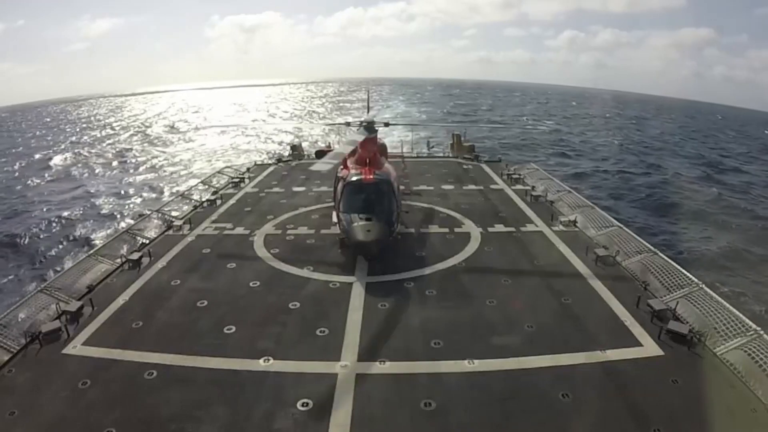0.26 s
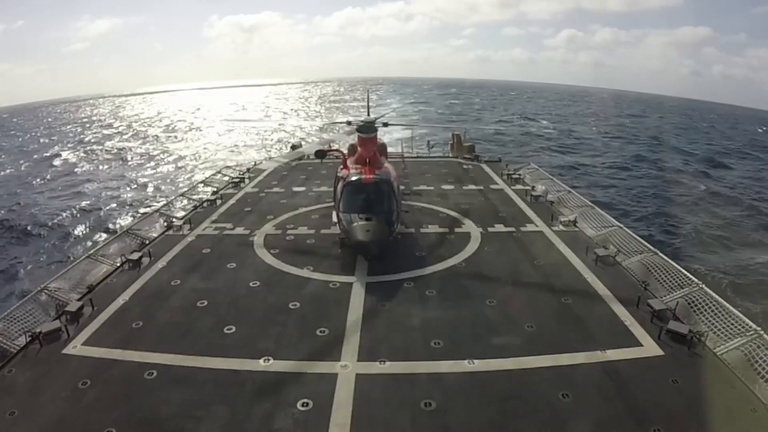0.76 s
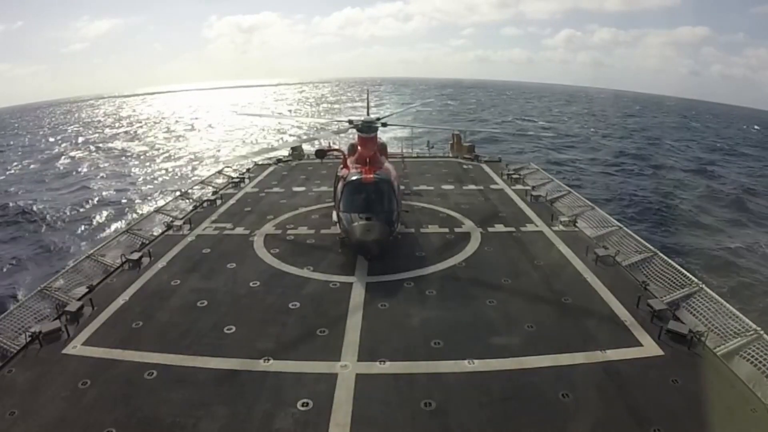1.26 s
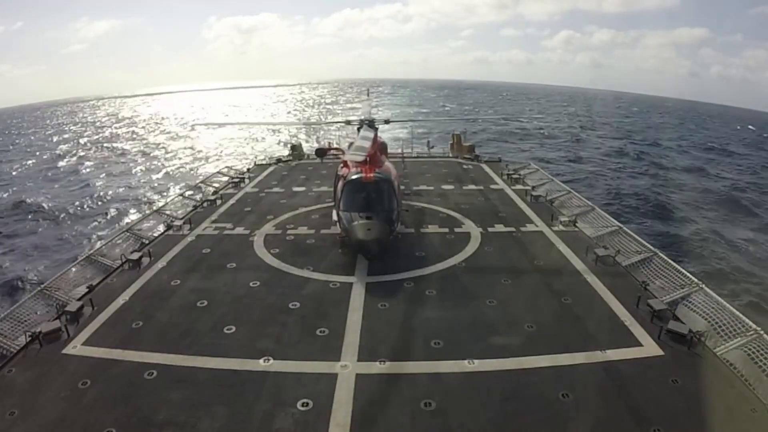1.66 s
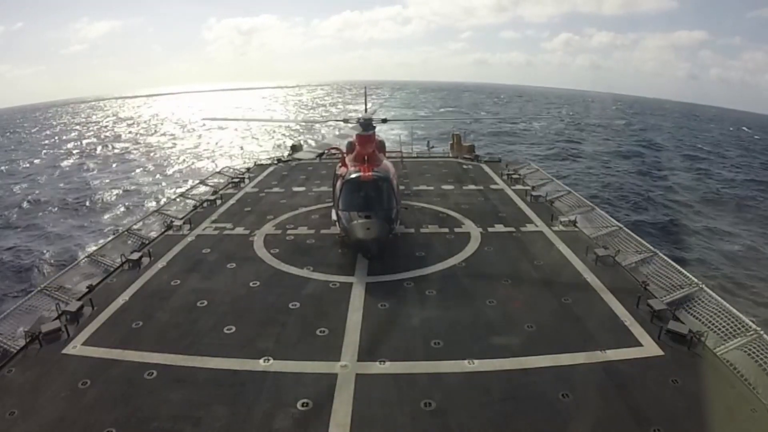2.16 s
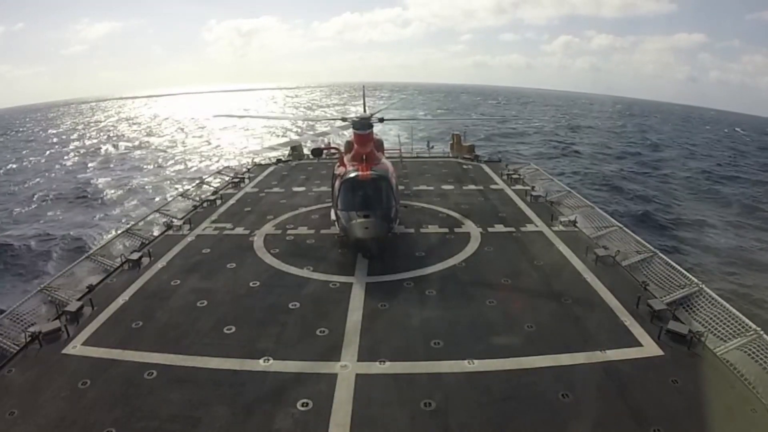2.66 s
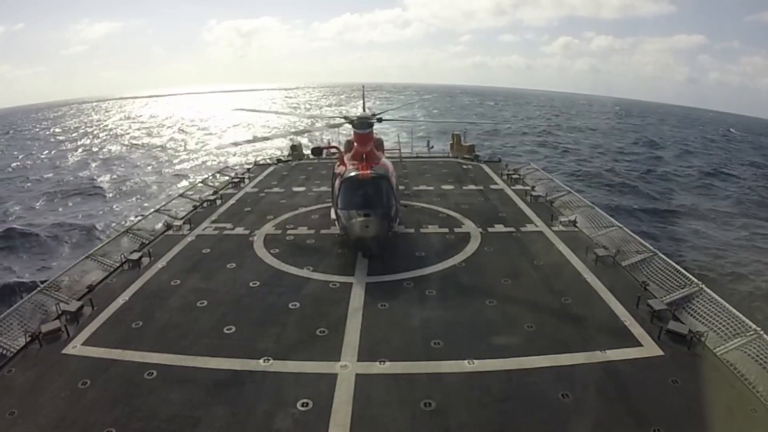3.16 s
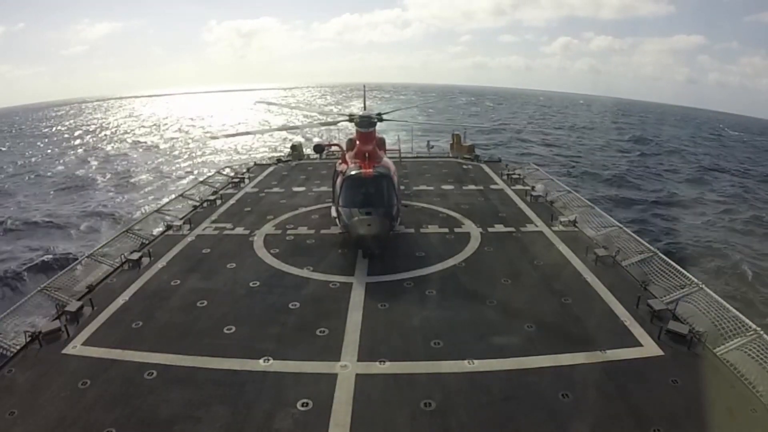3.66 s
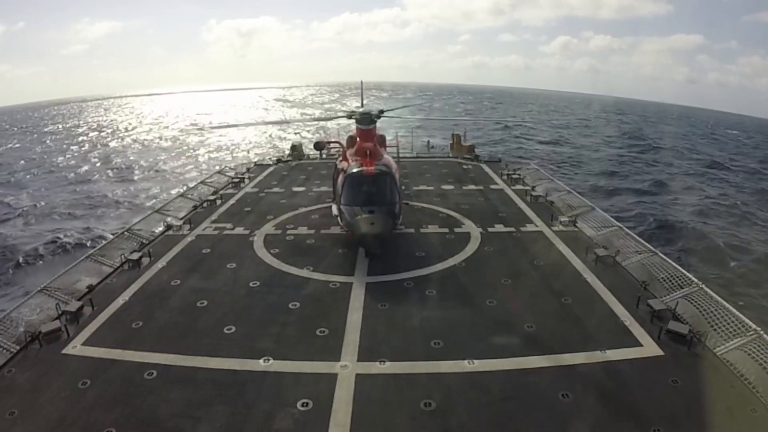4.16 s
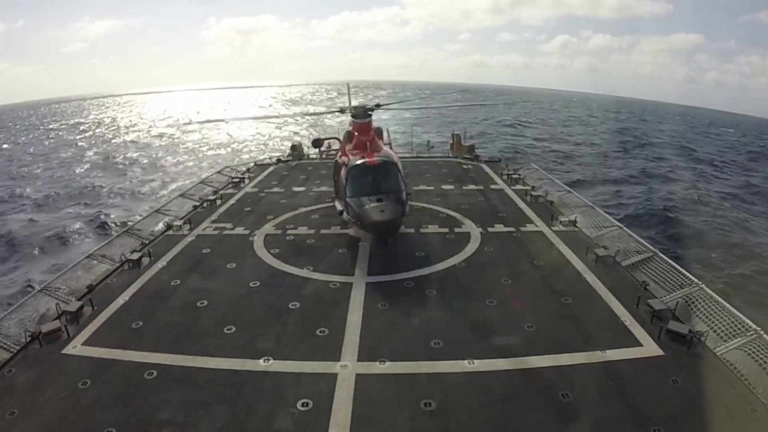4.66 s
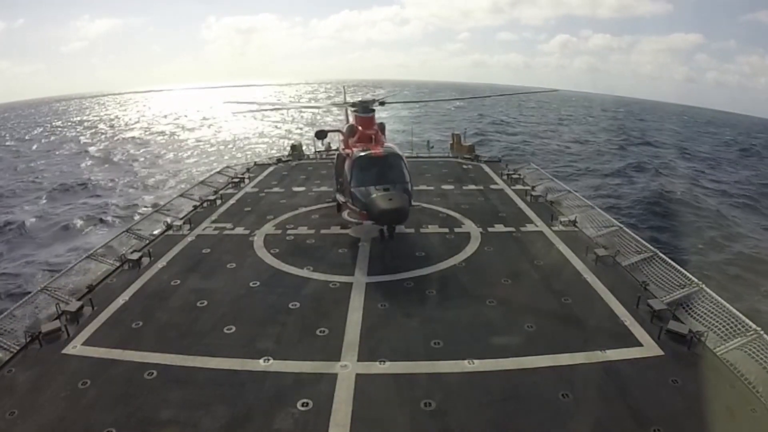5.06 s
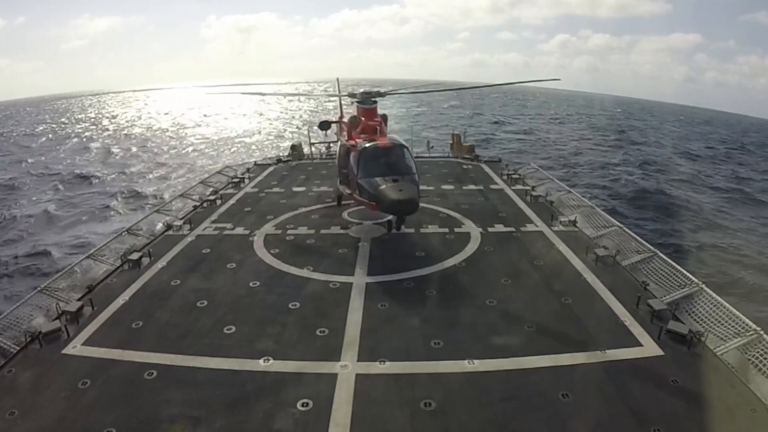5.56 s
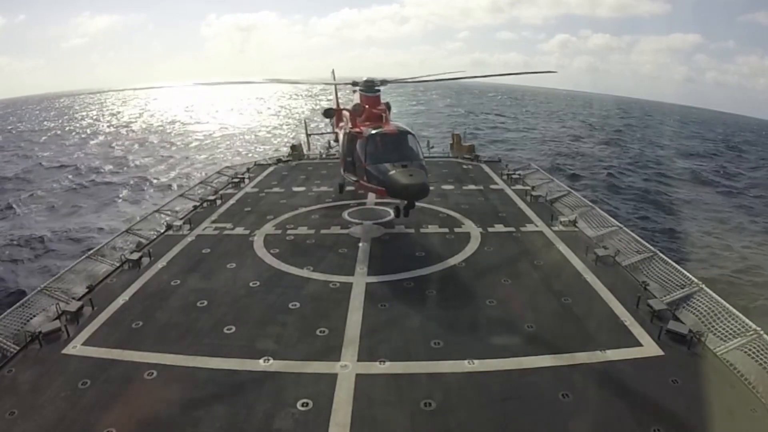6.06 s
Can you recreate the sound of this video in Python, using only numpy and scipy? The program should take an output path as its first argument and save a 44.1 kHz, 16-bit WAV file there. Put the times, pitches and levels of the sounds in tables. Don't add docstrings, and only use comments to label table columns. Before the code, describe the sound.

Muffled heavy blade chopping at about twenty-four beats a second grows louder and rougher through takeoff, with dull cracks, light rustles and faint turbine hiss.

```python
import sys
import numpy as np
from scipy import signal
from scipy.fft import rfft, irfft
from scipy.io import wavfile
from scipy.ndimage import uniform_filter1d, map_coordinates

SR = 44100
rng = np.random.default_rng(int(sys.argv[2]) if len(sys.argv) > 2 else 0)


def nominal_scale(level):
    x = np.asarray(level, float) / 20
    return 10 ** x


def dump(signal):
    limited = np.clip(np.atleast_2d(signal).T, -1, 1)
    pcm = np.round(limited * 32767).astype(np.int16)
    wavfile.write(sys.argv[1], SR, pcm)


N = 278271


def unit(x):
    return x / np.sqrt(np.mean(np.abs(x) ** 2) + 1e-20)


def along(points, hz):
    f, v = np.transpose(points)
    return np.interp(np.log(hz + 1), np.log(f + 1), v)


def curves(rows):
    s, *cols = np.transpose(rows)
    return [np.interp(np.arange(N) / SR, s, c) for c in cols]


def wobble(rate):
    return map_coordinates(rng.standard_normal(N // 256), [np.arange(N) * rate / SR])


def turns(hz):
    return 2 * np.pi * np.cumsum(hz) / SR


def swells(rows):
    t = np.arange(0, N / SR + .01, .004)
    s, db, half = np.transpose(rows)[:, :, None]
    bells = nominal_scale(db - 9 * ((t - s) / half) ** 2)
    return np.interp(np.arange(N) / SR, t, np.sqrt(np.sum(bells ** 2, axis=0)))


LIFT_S, LIFT_TAKES_S = 4.1, .12


def airborne():
    return .5 + .5 * np.tanh((np.arange(N) / SR - LIFT_S) / LIFT_TAKES_S)


# centre_hz, width_hz, lift_db
CASE_MODES = [(490, 140, 5), (923.5, 70, 3.5), (1537, 70, 6), (2070, 340, 1.5), (4240, 230, 3),
              (5840, 320, 2.5), (386, 19, -6)]


def case_gain(hz):
    return nominal_scale(sum(db / (1 + (2 * (hz - c) / w) ** 2) for c, w, db in CASE_MODES))


def rush(spectrum, patchy_db):
    _, _, z = signal.stft(rng.standard_normal(N + SR), SR, nperseg=512)
    field = uniform_filter1d(rng.standard_normal(z.shape), size=6, axis=0)
    field = uniform_filter1d(field, size=10, axis=1)
    x = signal.istft(z * nominal_scale(patchy_db * unit(field)), SR, nperseg=512)[1]
    hz = np.fft.rfftfreq(len(x), 1 / SR)
    coloured = rfft(x) * nominal_scale(along(spectrum, hz)) * case_gain(hz)
    return unit(irfft(coloured, len(x))[:N])


# time_s, slap_db
BLADE_LOAD = [(0, -40), (1.09, -38.5), (1.35, -36.5), (1.6, -35.5), (1.77, -32.5), (2.18, -34.5),
              (2.41, -30.5), (3.0, -31.5), (3.1, -32.5), (3.39, -29), (3.76, -32), (4.05, -28), (4.12, -23),
              (4.31, -31.5), (4.52, -30), (4.92, -32.5), (5.8, -29.5), (6.31, -30.5)]
MEAN_LOAD_DB = -32


def blade_load_db():
    return curves(BLADE_LOAD)[0]


# start_s, peak_db, centre_hz, top_hz, length_s
RUSTLE_BURSTS = [(2.022, -51.5, 3700, 6000, 0.08), (2.065, -48.5, 3740, 6450, .05),
                 (2.325, -54, 3500, 6000, .03), (3.8, -42, 3000, 6500, 0.029),
                 (3.819, -32.5, 4100, 4670, 0.029), (3.816, -42.5, 2820, 14000, 0.04),
                 (3.851, -49.5, 3500, 11000, 0.11), (3.895, -48, 5000, 10000, 0.022),
                 (3.928, -46.5, 4000, 7700, 0.082), (3.961, -41, 7260, 8420, 0.029),
                 (4.002, -42.5, 7600, 12000, 0.036), (4.058, -45, 1500, 4060, 0.023),
                 (4.083, -44.5, 1800, 6980, 0.063), (4.124, -47.5, 5400, 6950, 0.076),
                 (4.159, -53, 4040, 8350, 0.036), (5.348, -38, 2610, 3220, 0.011),
                 (5.796, -51, 2700, 3490, 0.021), (6.123, -47, 3000, 5500, 0.062)]


def rustle():
    out, t = np.zeros(N + SR), np.arange(SR // 4) / SR
    hz = np.fft.rfftfreq(len(t), 1 / SR) + 1
    for s, db, centre_hz, top_hz, length in RUSTLE_BURSTS:
        graininess = unit(uniform_filter1d(rng.standard_normal(len(t)), size=60))
        grains = rng.standard_normal(len(t)) * nominal_scale(2.5 * graininess)
        octaves = np.log2(hz / centre_hz)
        colour = nominal_scale(-4.5 * octaves + 7.2 * np.exp(-(octaves / 0.073) ** 2))
        colour *= hz ** 2 / (hz ** 2 + 1200 ** 2)
        colour /= np.sqrt((1 + (hz / top_hz) ** 8) * (1 + (hz / 12500) ** 12))
        burst = unit(irfft(rfft(grains) * colour * case_gain(hz), len(t)))
        envelope = nominal_scale(db - 5.0 - 15 * t / length) * (1 - np.exp(-t / (0.14 * length)))
        out[round(s * SR):][:len(t)] += envelope * burst
    return out[:N]


# freq_hz, density_db per Hz
JET_SPECTRUM = [(1060, -29), (1800, -1.5), (2150, -6), (2430, -10.5), (3390, -8.5), (4260, -11),
                (6670, -18.5), (9560, -22), (12800, -32), (14700, -35)]
HISS_DB, HISS_GROWS, HISS_LIFT_DB = -62.94, .12, 1.14


def jet_hiss():
    hiss_db = HISS_DB + HISS_GROWS * (blade_load_db() - MEAN_LOAD_DB) + HISS_LIFT_DB * airborne()
    return nominal_scale(hiss_db + 0.24 * wobble(6)) * rush(JET_SPECTRUM, patchy_db=1.0)


# time_s, pitch_hz
WHINE_PITCH = [
    (0, 9100),
    (.9, 9330),
    (1.4, 9530),
    (2, 9950),
    (4.3, 10560),
    (5.5, 10850),
    (6.31, 10870),
]
# peak_s, peak_db, half_length_s
LOWER_WHINE_SWELLS = [
    (.6, -90, .3),
    (2.3, -89, .2),
    (2.7, -90.5, .3),
]
UPPER_DB, LOWER_DB, LOWER_RATIO = -92.5, -95.5, .845


def compressor_whines():
    whine_hz, = curves(WHINE_PITCH)

    def whine(ratio):
        jitter_hz = (25 + 60 * airborne()) * wobble(70)
        return nominal_scale(5.5 + 2.5 * wobble(50)) * np.sin(turns(ratio * whine_hz + jitter_hz))

    lower_size = np.hypot(nominal_scale(LOWER_DB), swells(LOWER_WHINE_SWELLS))
    return nominal_scale(UPPER_DB) * whine(1) + lower_size * whine(LOWER_RATIO)


# start_s, peak_db, bright_part_db re peak
VORTEX_HITS = [(2.332, -27, -23.5), (2.456, -32, -14), (2.607, -32, -13.5), (2.645, -30, -12),
               (2.77, -31, -13), (2.852, -22.5, -27), (3.316, -25, -28), (3.357, -27, -12),
               (3.398, -18, -20), (3.44, -26.5, -12.5), (3.525, -29, -13), (3.972, -24, -14.5),
               (4.375, -30, -13), (4.503, -31, -11.5), (4.63, -26, -16), (4.71, -28, -18), (4.79, -27, -18),
               (4.885, -24, -10.5), (5.13, -28, -10), (5.559, -25, -12), (5.766, -24, -16),
               (5.796, -18, -13.5), (5.85, -24.5, -12), (6.124, -20.5, -13)]


def cracks():
    out, t = np.zeros(N + SR), np.arange(SR // 8) / SR
    for s, db, bright_db in VORTEX_HITS:
        levels_db = [0, bright_db - 2.5, bright_db - 14, bright_db - 10] + rng.normal(0, 1.5, size=4)
        ring = 0
        for level, (centre_hz, width_hz, _) in zip(levels_db, CASE_MODES):
            decay = np.exp(-np.pi * .4 * width_hz * t)
            ring = ring + nominal_scale(level) * decay * np.sin(2 * np.pi * centre_hz * rng.normal(1, .04) * t)
        out[round(s * SR):][:len(t)] += nominal_scale(db - 1.5) * (1 - np.exp(-t / .001)) * ring
    return out[:N]


# freq_hz, density_db per Hz
WAKE_SPECTRUM = [(350, -26.5), (600, -2), (754, -10.5), (917, -5), (1100, -11.5), (1540, -16.5),
                 (3000, -28), (3900, -60), (6600, -120)]
WAKE_DB, WAKE_GROWS, WAKE_LIFT_DB = -50.5, 0.69, 2


def wake_noise(beat, flutter, slap_db):
    wake_db = WAKE_DB + WAKE_GROWS * (slap_db - MEAN_LOAD_DB) + WAKE_LIFT_DB * airborne()
    return nominal_scale(wake_db) * unit(nominal_scale(1.3 * beat + 0.55 * flutter) * rush(WAKE_SPECTRUM, patchy_db=-1.24))


# freq_hz, density_db per Hz
SLAP_SPECTRUM = [(18, -43), (30, -14.5), (54, -24), (86, -7.5), (123, -9), (184, 3.5), (232, -5),
                 (366, -14.5), (501, -18.5), (800, -35), (1040, -67), (1760, -120)]


def blade_slap(beat, flutter, slap_db):
    return nominal_scale(slap_db + 2.0) * unit(nominal_scale(2.2 * beat + 0.5 * flutter) * rush(SLAP_SPECTRUM, patchy_db=0.5))


def order(blade, multiple, rough, rate):
    rough = np.clip(rough, 0, 1)
    shake = np.sqrt(1 - rough ** 2) + rough * unit(wobble(rate) + 1j * wobble(rate))
    return unit(np.real(shake * np.exp(1j * (multiple * blade + 2 * np.pi * rng.random()))))


PUSH_DB, PUSH_LIFT_DB, PUSH_SWAY_DB = -47, 7, 2.5


def pushed_air(blade):
    push_db = PUSH_DB + PUSH_LIFT_DB * airborne() + PUSH_SWAY_DB * wobble(8.3)
    return nominal_scale(push_db) * order(blade, 1, rough=0.22, rate=6.5)


# multiple, level_db re slap, roughness 0-1
MINOR_ORDERS = [(1.37, -22, 1), (2, -24, 0.7), (3, -20, 1), (5, -8.5, 0.6), (9, -4.5, 1), (10, -9, 0.92),
                (11, -10, .95), (12, -11, .95), (13, -19, 0.98), (14.5, -20, 0.91)]


def minor_orders(blade, slap_db):
    return sum(nominal_scale(slap_db + db) * order(blade, k, rough, rate=15) for k, db, rough in MINOR_ORDERS)


ROOM_ORDERS = [(4, .7), (6, .8), (7, .95), (8, 1.25)]
# peak_s, peak_db, half_length_s
SWELLS_OF_4 = [(.3, -38.5, 0.37), (.85, -39.5, 0.18), (1.35, -37.5, 0.43), (1.8, -34.5, 0.16),
               (2.07, -38, .05), (2.54, -35, 0.063), (3.2, -36, 0.086), (3.62, -32.5, .15),
               (3.87, -32, 0.065), (4.16, -28, 0.11), (4.36, -26, .08), (4.66, -34, 0.036),
               (4.88, -32.5, 0.077), (5.12, -34.5, .12), (5.44, -28.5, 0.12), (5.85, -30, 0.12),
               (6.0, -28.5, 0.19), (6.25, -31.5, 0.14)]
SWELLS_OF_6 = [(1.35, -29, .07), (1.88, -37, .05), (2.17, -30.5, .1), (2.57, -33.5, 0.096),
               (3.37, -25, 0.041), (3.74, -26.5, 0.091), (4.02, -26.5, 0.076), (4.28, -27.5, 0.11),
               (4.62, -26.5, 0.053), (4.799, -25, 0.028), (5.191, -33, 0.1), (5.36, -34.5, .06),
               (5.62, -24, .1), (5.981, -20.5, 0.069)]
SWELLS_OF_7 = [(.12, -32, 0.34), (.52, -30, 0.1), (1.02, -35, 0.14), (1.3, -26, 0.043), (1.46, -29, .06),
               (1.63, -29, 0.091), (1.86, -27.5, 0.15), (2.16, -25, 0.12), (2.459, -20.5, 0.047),
               (2.61, -15.5, 0.078), (3.16, -20, 0.042), (3.29, -25, 0.091), (3.429, -15, 0.041),
               (3.779, -22, 0.046), (3.98, -16.5, 0.042), (4.21, -17, 0.13), (4.508, -15, 0.074),
               (4.74, -27.5, 0.048), (5.0, -22.5, .09), (5.238, -18.5, 0.038), (5.358, -21.5, 0.034),
               (5.48, -28, 0.044), (5.7, -21, 0.095), (5.95, -21, 0.12), (6.31, -22.5, 0.067)]
SWELLS_OF_8 = [(.12, -30, 0.16), (.48, -30, 0.18), (1.33, -31.5, 0.17), (1.72, -29.5, 0.085),
               (1.92, -27, 0.13), (2.351, -26, .05), (2.53, -24.5, 0.09), (2.92, -25, 0.062),
               (3.31, -25, 0.078), (3.6, -28, 0.21), (3.97, -30.5, 0.14), (4.16, -17, .05),
               (4.37, -23.5, .08), (4.67, -25, 0.067), (5.04, -23.5, 0.044), (5.17, -26, 0.042),
               (5.48, -30, 0.035), (5.641, -21, 0.063), (5.84, -22, 0.2), (5.99, -26.5, .07),
               (6.28, -23, .07)]
LULLS = [-9, -8, -2, -8]
LULL_SWAY_DB = 3.5


def boom(blade, slap_db):
    out = 0
    rows = [SWELLS_OF_4, SWELLS_OF_6, SWELLS_OF_7, SWELLS_OF_8]
    for row, lull_db, (multiple, wander) in zip(rows, LULLS, ROOM_ORDERS):
        lull = nominal_scale(slap_db + lull_db + LULL_SWAY_DB * wobble(13))
        drift = wander * wobble(11) + 2 * np.pi * rng.random()
        out = out + np.hypot(swells(row), lull) * np.cos(multiple * blade + drift)
    return nominal_scale(1.5) * out


# time_s, rate_hz
PASSING_RATE = [
    (0, 24.22),
    (4.8, 24.22),
    (5.2, 24.0),
    (6.31, 24.0),
]
SLAP_LAG = -1.5


def rotor():
    blade = turns(curves(PASSING_RATE)[0])
    slap_db = blade_load_db()
    beat = np.cos(blade + SLAP_LAG)
    flutter = wobble(16)
    tones = pushed_air(blade) + boom(blade, slap_db) + minor_orders(blade, slap_db)
    return tones + blade_slap(beat, flutter, slap_db) + wake_noise(beat, flutter, slap_db)


def scene():
    return (rustle() + jet_hiss() + compressor_whines() + cracks() + rotor())[None]


def ragged_treble(x):
    hz, _, z = signal.stft(x, SR, nperseg=2048)
    level_db = 20 * np.log10(np.abs(z) + 1e-9)
    bass_db = uniform_filter1d(level_db[:, 3:20].max(axis=1), size=3, axis=1)
    ragged_hz = 800 * np.repeat(rng.standard_normal((43, z.shape[2])), 24, axis=0)[:len(hz)]
    ragged_hz = ragged_hz + 450 * rng.standard_normal(z.shape[2])
    edge_hz = np.maximum(12950 - 150 * (bass_db[:, None] + 30) + ragged_hz, 10900)
    faint = uniform_filter1d(level_db, size=16, axis=1) < -104
    lost = (hz[:, None] > edge_hz) & faint
    return signal.istft(z * ~lost, SR, nperseg=2048)[1][:, :N]


def band_limit(x):
    return signal.sosfilt(signal.butter(12, 14860, fs=SR, output="sos"), x)


def record(dry):
    dry = dry / (1 + np.abs(dry / .46) ** 5) ** (1 / 5)
    fade = np.clip(np.arange(N)[::-1] / (.002 * SR), 0, 1)
    mix = ragged_treble(dry * fade)
    return band_limit(mix)


dry = scene()
out = record(dry)
dump(out)
```